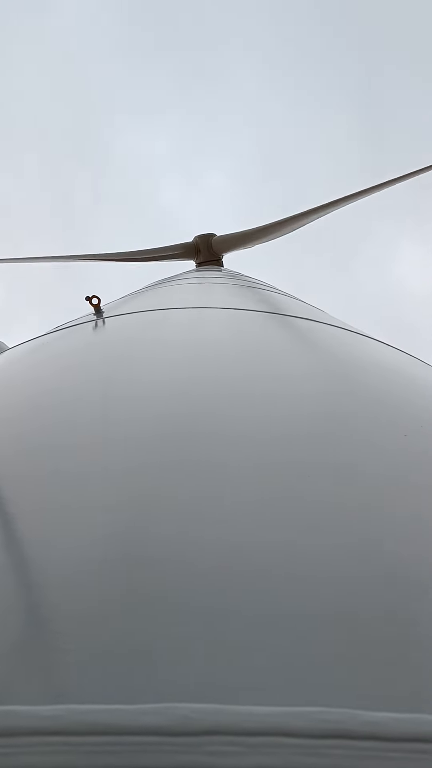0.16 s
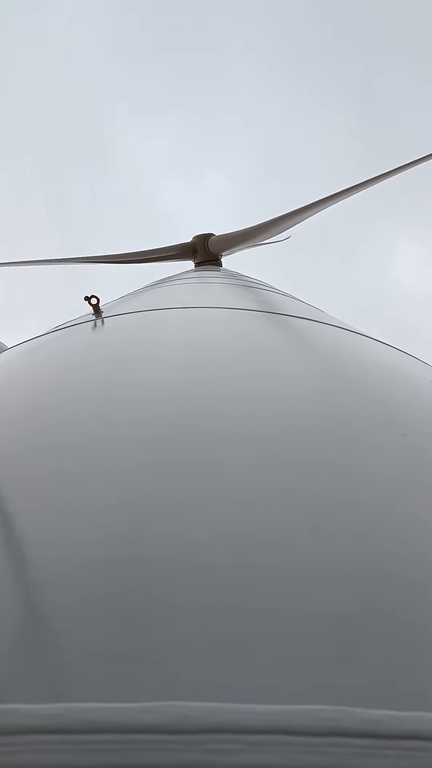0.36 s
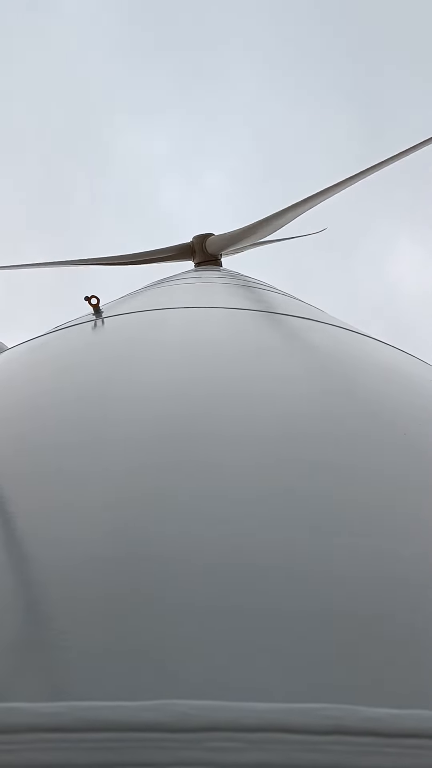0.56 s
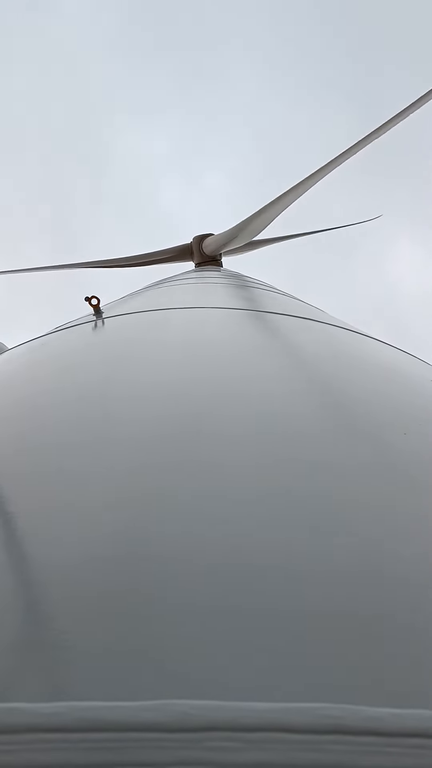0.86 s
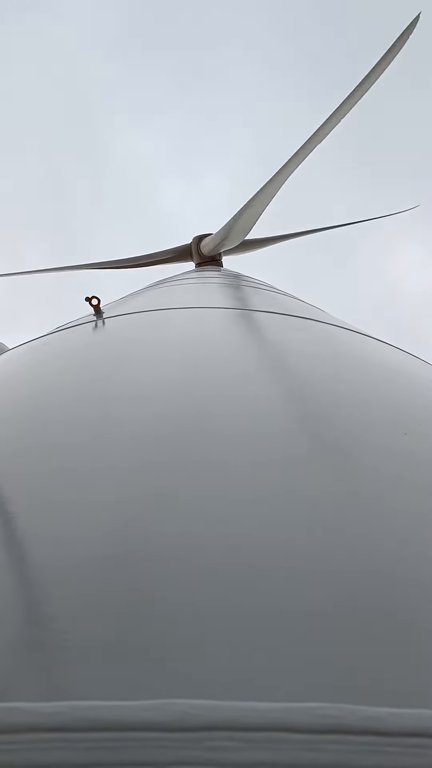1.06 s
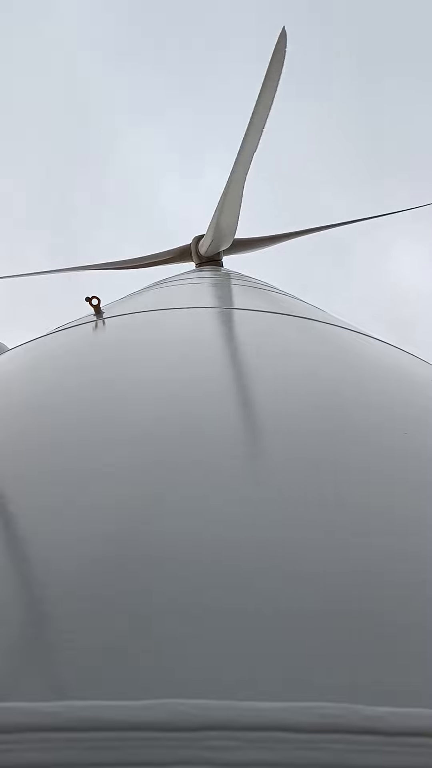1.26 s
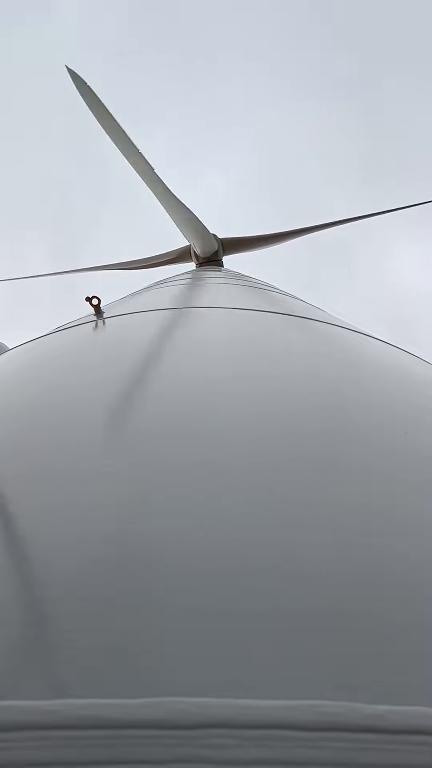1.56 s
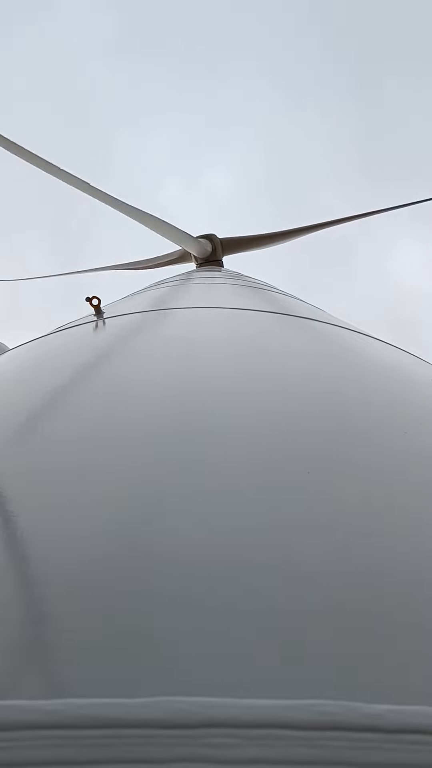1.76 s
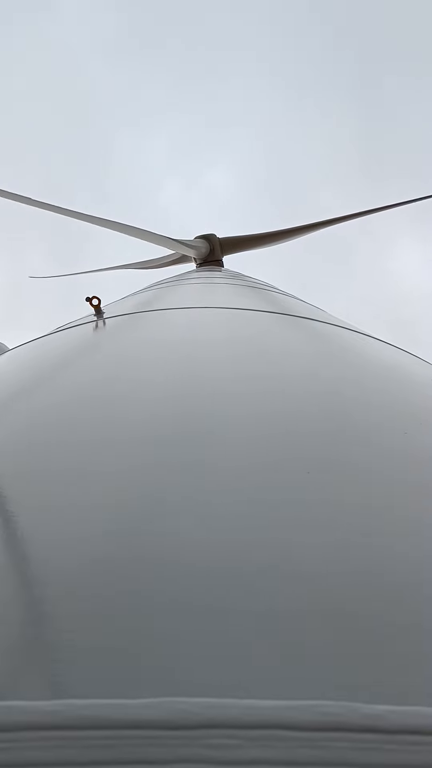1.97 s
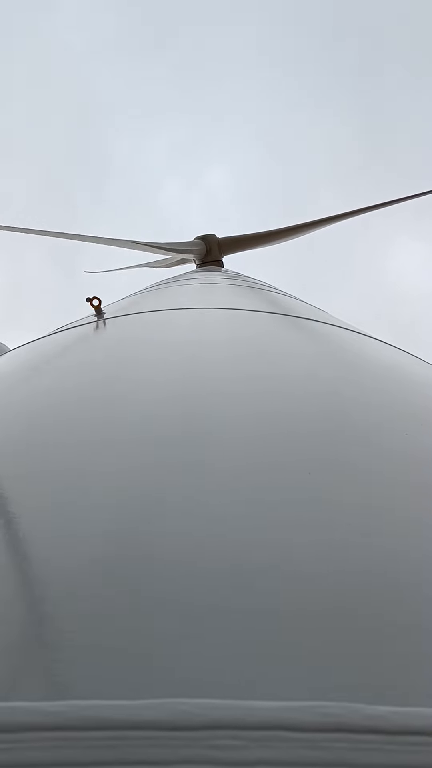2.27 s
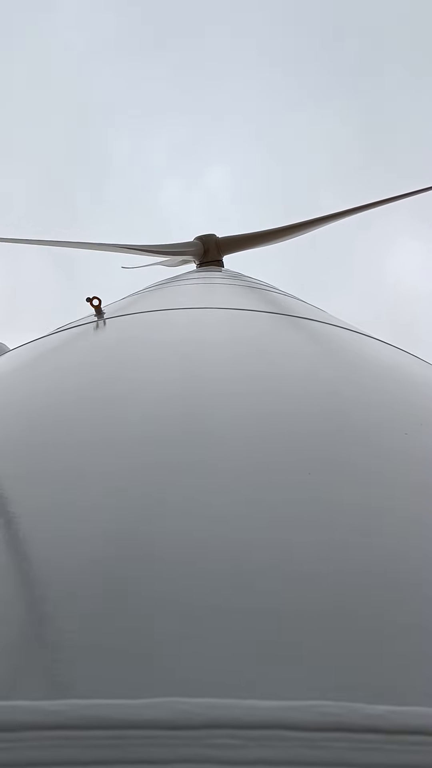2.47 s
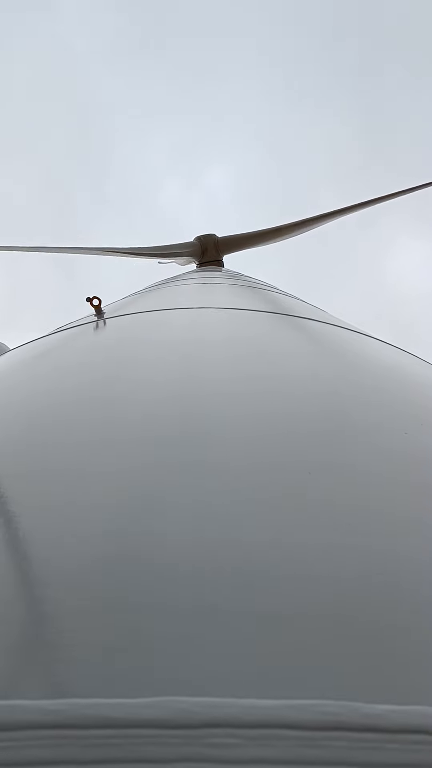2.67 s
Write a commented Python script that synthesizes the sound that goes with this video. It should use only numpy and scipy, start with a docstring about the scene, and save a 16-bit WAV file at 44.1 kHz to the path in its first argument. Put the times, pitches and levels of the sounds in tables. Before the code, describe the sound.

Wind turbine blade swishing overhead, with gusts thumping on the microphone

```python
"""Under a large wind turbine in an open field. From the start there is a steady wash of air, and the
breeze hits the two microphone openings (ports) with low puffs and knocks, mostly on the right.
The previous blade's thin whistle fades as the next blade comes near, its tip whistling high up.
At about 1.3 s it sweeps overhead with an airy swish, the whistle sliding down as it passes and leaves.
Gusts shake the right port just before that, and twice more as the blade moves away."""
import sys
import numpy as np
from scipy import signal
from scipy.fft import rfft, irfft, next_fast_len
from scipy.io import wavfile
from scipy.ndimage import uniform_filter1d

SR = 44100
rng = np.random.default_rng(int(sys.argv[2]) if len(sys.argv) > 2 else 0)


def store_pcm(level_fs):
    """Save levels as 16-bit WAV."""
    pcm = np.round(np.clip(level_fs, -1, 1) * 32767).astype(np.int16)
    wavfile.write(sys.argv[1], SR, np.atleast_2d(pcm).T)


N = 123921
TIME = np.arange(N) / SR
FRAME_S = np.arange(N // 256 + 5)[:, None] * 256 / SR  # time steps for shaping noise
BIN_HZ = np.fft.rfftfreq(1024, 1 / SR)  # pitch steps for shaping noise

# Tone colour (how strong each pitch is) of the rotor and field's wash: pitch_hz, left_db, right_db
WASH_COLOUR = [(20, -7, 5), (42, -4, -5), (93.4, 23, 24.5), (221, 17.5, 18), (324, 6, 0.5), (650, 0, 0),
               (1180, -3.5, -0.5), (1940, -7.5, -5.5), (3280, -9, -10.5), (4120, -13.5, -13),
               (6200, -9.5, -17.5), (6970, -13.5, -22), (7800, -10, -24.5), (8750, -14.5, -9),
               (9800, -21, -18), (11900, -26, -26), (16000, -23, -25)]
# Rise and fall of the high hiss in that wash: time_s, boost_db
HISS_BOOST = [(0, -0.5), (.3, -3.5), (.6, 1), (.9, -1), (1.55, -1), (1.9, 1.5), (2.07, 0.5), (2.17, 2),
              (2.25, 0), (2.36, 1.5), (2.6, 1.5), (2.81, 0.5)]
# Strength of the breeze on the ports: time_s, left_db, right_db
BREEZE_LEVELS = [(0, -30.5, -47), (.15, -42.5, -36), (.36, -42, -42.5), (.52, -47.5, -49), (.7, -42, -37.5),
                 (.86, -57, -35), (.95, -43, -34.5), (1.08, -43, -26.5), (1.19, -50, -38.5),
                 (1.32, -43, -37.5), (1.44, -50, -39), (1.6, -65, -34), (1.7, -62, -28), (1.86, -60, -23.5),
                 (2, -64, -37), (2.09, -69, -34.5), (2.3, -59, -30.5), (2.55, -55, -33),
                 (2.81, -45.5, -31.5)]
# Tone colour of the breeze's rumble: pitch_hz, level_db
RUMBLE_COLOUR = [(20, -16), (44, -42), (64, -11), (88, 0), (125, 0.5), (200, 0.5), (300, -10.5), (450, -24),
                 (700, -37.5), (1200, -54), (3000, -77)]
# Small swirls of air that hit the ports: peak_s, length_s, level_db, hard_edge_db, left_minus_right_db
SWIRLS = [(.027, 0.014, -30.5, -4.5, 12), (0.052, 0.015, -33, -4.5, 11), (.106, 0.011, -28, -16, -18),
          (0.131, 0.01, -22.5, -22, -23), (.16, .01, -24, -15.5, -21), (0.174, 0.0063, -33.5, -6, -16),
          (.22, 0.0063, -28, -22, -28), (0.247, 0.012, -29.5, -11.5, -2), (.279, 0.0092, -31.5, -17, -9),
          (0.442, .022, -30.5, -30, -2), (0.472, .0084, -31.5, -17, -28), (.577, 0.025, -31, -16, -12.5),
          (.625, 0.024, -34, -24, -4.5), (.689, 0.013, -24, -32, -32), (.771, .014, -24.5, -37, -23),
          (.8, 0.014, -27.5, -23, -28), (0.896, 0.013, -30.5, -8, -25), (0.923, 0.019, -26, -29, -15),
          (.947, 0.0087, -29, -11, -22), (.976, 0.0088, -19, -31, -29), (1.035, 0.023, -24, -12.5, -24),
          (1.05, 0.0078, -24.5, -5, -37), (1.067, 0.011, -17, -10, -37), (1.081, 0.0068, -26, -3, -30),
          (1.099, 0.0065, -23.5, -6.5, -28), (1.12, 0.017, -21, -17, -19), (1.161, 0.0067, -25.5, -29, -18),
          (1.226, 0.0051, -18, -23, -32), (1.245, 0.0052, -22, -10.5, 20), (1.287, 0.018, -25, -14, -16),
          (1.33, 0.019, -26, -15, -13), (1.37, 0.0072, -27.5, -11, -18), (1.396, .014, -30, -8, -4),
          (1.455, 0.0033, -28.5, -3.5, -20), (1.475, 0.0088, -22, -6, -20),
          (1.513, 0.006, -23.5, -5.5, -26), (1.532, 0.0086, -22.5, -7.5, -35),
          (1.579, 0.0083, -28.5, -12.5, -32), (1.646, 0.0069, -21.5, -7.5, -29),
          (1.662, 0.017, -28, -9.5, -26), (1.708, 0.017, -25, -16, -22), (1.75, 0.0081, -21, -6, -30),
          (1.783, 0.02, -26.5, -13, -19), (1.812, 0.0081, -29, -6.5, -24), (1.846, .009, -24.5, -4, -33),
          (1.865, 0.034, -25.5, -17.5, -27), (1.9, 0.01, -29, -12.5, -30), (1.917, 0.015, -22, -9.5, -32),
          (1.937, 0.017, -28, -5.5, -32), (1.961, 0.019, -25.5, -9.5, -29), (1.991, 0.015, -28.5, -9, -25),
          (2.017, 0.0028, -27.5, -8, -25), (2.042, 0.016, -27.5, -28, -34), (2.125, 0.03, -29, -23, -26),
          (2.209, 0.0093, -26.5, -7, -21), (2.231, 0.0062, -21.5, -16, -34),
          (2.248, 0.0075, -22.5, -9.5, -35), (2.269, 0.0083, -22.5, -11, -28),
          (2.292, 0.0055, -23.5, -10, -30), (2.308, 0.018, -29.5, -17, -28), (2.328, 0.013, -31.5, -4, -28),
          (2.353, 0.0058, -17, -13, -24), (2.388, 0.013, -21, -14.5, -33), (2.427, 0.0075, -21.5, -31, -27),
          (2.472, .0065, -20, -17, -31), (2.514, 0.0086, -19.5, -3.5, -30), (2.547, 0.0066, -23, -1, -36),
          (2.56, 0.013, -16, -6.5, -36), (2.639, 0.019, -24.5, -8.5, -14.5), (2.695, 0.02, -26, -13, -8),
          (2.711, 0.0074, -29.5, -9, -11), (2.73, 0.0062, -24.5, -30, -33),
          (2.788, 0.0069, -19.5, -9.5, -17)]
# Tone colour of a swirl's dull thump: pitch_hz, level_db
THUMP_COLOUR = [(20, -25), (42, -37), (62, -14), (88, -5.5), (125, -0.5), (200, -2.5), (300, -13),
                (450, -28.5), (700, -44), (1500, -70), (6000, -125)]
# Sharp pressure jumps on the right port: time_s, peak_db, top_hz
PRESSURE_JUMPS = [(.128, -31.5, 500), (0.685, -38, 517), (1.046, -32, 660), (1.066, -37, 720),
                  (1.083, -26.5, 720), (1.098, -30, 690), (1.643, -25.5, 557), (1.748, -25, 690),
                  (1.842, -23.5, 560), (1.9, -24, 505), (1.907, -23, 520), (2.245, -35, 530),
                  (2.289, -28, 654), (2.352, -24, 500), (2.392, -28.5, 710), (2.47, -30, 520),
                  (2.513, -20.5, 740), (2.559, -14.5, 730), (2.791, -25, 560)]
# Stretches where the blade tip whistles:
# mid_slide_pitch_hz, width_hz, level_db, peak_s, rise_s, fall_s, left_minus_right_db
TIP_WHISTLES = [(8690, 170, -53.3, 1.33, .16, .05, -14), (8670, 190, -62, 1.52, .38, .18, -12),
                (9630, 240, -68, 1.28, .09, .06, -6), (9600, 190, -61.3, 1.75, .16, .085, -17),
                (9650, 230, -76, .85, .4, .3, -7), (8420, 680, -59.7, 1.25, .33, .24, -7),
                (8350, 400, -62.5, .7, .05, .14, -11), (8600, 320, -69.5, .36, .14, .2, -14),
                (8650, 240, -70, 2.1, .15, .06, 2)]
# Tone colour of the blade's swish: pitch_hz, left_db, right_db
SWISH_COLOUR = [(199, 7, 5.5), (645, 13.5, 16.5), (940, 2.5, 2), (1540, -17, 5.5), (2070, 4.5, -3.5),
                (2970, -3, -0.5), (4370, -3.5, -5.5), (6050, -8, -14), (7300, -26, -20), (9770, -23, -1.5),
                (11600, -31, -27), (16000, -33, -34)]
# Narrower rushes of air along the blade's way: peak_s, swell_s, level_db, pitch_hz, width_octaves
BLADE_RUSHES = [(0.67, 0.26, -62.5, 690, 1.45), (0.37, 0.15, -66, 1274, 0.19),
                (0.507, 0.021, -57.5, 740, 0.33), (1.234, 0.17, -63, 2200, 0.81),
                (2.3, 0.091, -70, 5100, 0.28)]
# The strongest moments of the gusts: peak_s, swell_s, level_db
GUST_PEAKS = [(1.075, 0.034, -44.5), (1.93, 0.086, -49.5), (2.25, 0.059, -50.5)]


def amp(db):
    """Turns decibels into a number to multiply by."""
    return 10 ** (np.asarray(db) / 20)


def unit(x):
    """Scales a signal to an average strength (rms) of 1."""
    return x / np.sqrt(np.mean(x ** 2) + 1e-30)


def colour(table, hz):
    """Gains at the pitches hz, one row for each level column of a tone colour table."""
    pitches, *columns = np.transpose(table)
    return np.array([amp(np.interp(np.log(hz + 1), np.log(pitches), db)) for db in columns])


def hump(pitch_hz, octaves):
    """A bell-shaped curve around one pitch."""
    return np.exp(-(np.log2((BIN_HZ + 1) / pitch_hz) / octaves) ** 2)


def band(hz, low_hz, top_hz, low_slope, top_slope):
    """Gains that turn down pitches below low_hz and above top_hz; bigger slopes cut harder."""
    return 1 / (1 + (low_hz / hz) ** low_slope) / (1 + (hz / top_hz) ** top_slope)


def pan(left_minus_right_db):
    """Left and right gains that keep the total power the same."""
    gains = np.array([[amp(left_minus_right_db)], [1.]])
    return gains / np.linalg.norm(gains)


def wander(rate_hz):
    """A smooth random wiggle of strength 1, up to about rate_hz fast."""
    padded = next_fast_len(N, True)
    hz = np.fft.rfftfreq(padded, 1 / SR)
    keep_slow = np.exp(-(hz / rate_hz) ** 2) * (hz > 0)
    return unit(irfft(rfft(rng.standard_normal(padded)) * keep_slow, padded)[:N])


def flutter(depth_db, rate_hz):
    """A gain that wobbles at random."""
    return amp(depth_db * wander(rate_hz))


def swell(peak_s, rise_s, fall_s):
    """Gain of a source that beams its sound as it comes near and leaves."""
    return 1 / (1 + .5 * ((TIME - peak_s) / np.where(TIME < peak_s, rise_s, fall_s)) ** 2)


def airy(gain, patch_db=1.6, likeness=0.036):
    """Stereo noise of churning air, shaped by gain, with drifting louder and softer patches."""
    a, b, c, d, patches = rng.standard_normal((5, len(FRAME_S), len(BIN_HZ)))
    patches = uniform_filter1d(patches, size=14, axis=0)  # smooth over time
    patches = unit(uniform_filter1d(patches, size=7, axis=1))  # and over pitch
    left = a + 1j * b
    right = likeness * left + np.sqrt(1 - likeness ** 2) * (c + 1j * d)
    spectra = np.array([left, right]) * gain * amp(patch_db * patches)
    _, noise = signal.istft(spectra.swapaxes(1, 2), nperseg=1024, noverlap=768)
    return unit(noise[:, :N])


def lumpy_flow(shape):
    """The noise of quick, uneven wind in a given tone colour."""
    flow = rng.standard_normal(N) * flutter(depth_db=3, rate_hz=42)
    return unit(irfft(rfft(flow) * shape, N))


def whistle(pitch_hz, width_hz):
    """A fuzzy, fluttering tone: narrow noise that follows a pitch, scattered differently to each port."""
    phase = 2 * np.pi * np.cumsum(pitch_hz * np.ones(N)) / SR
    wobble = flutter(depth_db=2.2, rate_hz=16)
    ports = [unit(wander(width_hz) * np.cos(phase) + wander(width_hz) * np.sin(phase)) for _ in range(2)]
    return wobble * np.array(ports)


def burst(length_s, shape, size):
    """One short burst of pressure in a given tone colour, about strength 1 at its top."""
    from_middle_s = (np.arange(size) - size // 2) / SR
    window = np.exp(-2 * np.log(2) * (from_middle_s / length_s) ** 2)
    noise = irfft(rfft(window * rng.standard_normal(size)) * shape, size)
    return unit(noise) * np.sqrt(np.mean(window ** 2))


def wash():
    """Steady, distant air noise from rotor and field; its high hiss rises and falls a little."""
    hiss_db = hump(pitch_hz=4680, octaves=0.99) * np.interp(FRAME_S, *np.transpose(HISS_BOOST))
    return amp(-47.5) * airy(colour(WASH_COLOUR, BIN_HZ)[:, None] * amp(hiss_db))


def breeze():
    """The breeze pushes on each port separately, making a low, lumpy rumble."""
    times, *port_levels = np.transpose(BREEZE_LEVELS)
    shape = colour(RUMBLE_COLOUR, np.fft.rfftfreq(N, 1 / SR))[0]
    return np.array([lumpy_flow(shape) * amp(np.interp(TIME, times, db)) for db in port_levels])


def previous_blade(fade_db_per_s=12):
    """The thin whistle of the previous blade dies away, far off to the left."""
    return pan(18) * amp(-71.5 - fade_db_per_s * TIME) * whistle(pitch_hz=7950, width_hz=50)


def puffs(size=8192):
    """Each swirl of air hits the ports as a dull thump with a harder edge on top."""
    hz = np.fft.rfftfreq(size, 1 / SR) + 1
    out = np.zeros((2, N + 2 * size))
    dull = colour(THUMP_COLOUR, hz)[0]
    for peak_s, length_s, level_db, edge_db, side_db in SWIRLS:
        top_hz = 401 * 2 ** (0.07 * edge_db)  # harder swirls reach higher
        hard = band(hz, low_hz=301, top_hz=top_hz, low_slope=6, top_slope=5.44)
        at = round(peak_s * SR)
        for port, gain in enumerate(amp(level_db) * pan(side_db)):
            thump = burst(length_s, dull, size)
            edge = amp(edge_db + 1) * burst(0.76 * length_s, hard, size)
            out[port, at:at + size] += gain * (thump + edge)
    return out[:, size // 2:][:, :N]  # puts each burst's middle at its peak_s


def knocks(size=2048):
    """Single jumps of pressure, rounded off by the right port into short knocks."""
    hz = np.fft.rfftfreq(size, 1 / SR) + 1
    out = np.zeros((2, N + 2 * size))
    for time_s, peak_db, top_hz in PRESSURE_JUMPS:
        shape = band(hz, low_hz=240, top_hz=top_hz, low_slope=3, top_slope=5.9)
        random_phase = np.exp(2j * np.pi * rng.random())
        knock = np.roll(irfft(shape * random_phase, size), size // 2)
        at = round(time_s * SR)
        out[1, at:at + size] += amp(peak_db) * knock / abs(knock).max()
    return out[:, size // 2:][:, :N]


def blade_tip(mid_slide_s=1.51, slide_s=.67):
    """The tip's whistles sound higher as it comes near and lower as it leaves (the Doppler effect)."""
    slide = 1 - .125 * np.tanh((TIME - mid_slide_s) / slide_s)
    out = np.zeros((2, N))
    for pitch_hz, width_hz, level_db, peak_s, rise_s, fall_s, side_db in TIP_WHISTLES:
        level = amp(level_db) * swell(peak_s, rise_s, fall_s) ** 1.15
        out += pan(side_db) * level * whistle(pitch_hz * slide, width_hz)
    return out


def blade_swish():
    """The passing blade churns the air into a broad swish, with soft rushes that are higher later on."""
    level = amp(-53) * flutter(depth_db=0.4, rate_hz=6) * swell(peak_s=1.283, rise_s=.42, fall_s=.27)
    out = level * airy(colour(SWISH_COLOUR, BIN_HZ)[:, None])
    for peak_s, swell_s, level_db, pitch_hz, octaves in BLADE_RUSHES:
        out += amp(level_db) * airy(hump(pitch_hz, octaves)) * swell(peak_s, swell_s, swell_s)
    return out


def gusts():
    """At the height of a gust the wind tears at the right port with a harder flutter."""
    hz = np.fft.rfftfreq(N, 1 / SR) + 1
    flow = lumpy_flow(band(hz, low_hz=323, top_hz=566, low_slope=4, top_slope=4.8))
    level = sum(amp(db) * np.exp(-.5 * ((TIME - peak_s) / swell_s) ** 2)
                for peak_s, swell_s, db in GUST_PEAKS)
    return np.array([np.zeros(N), level * flow])


def scene():
    """The turbine overhead and the wind at the microphone, added together."""
    return wash() + breeze() + previous_blade() + puffs() + knocks() + blade_tip() + blade_swish() + gusts()


def record(dry):
    """Fades both ends quickly and cuts off the very highest treble."""
    fade_s, cutoff_hz = .004, 15800
    ends = np.clip(np.minimum(TIME, TIME[-1] - TIME) / fade_s, 0, 1)
    treble_cut = signal.firwin(511, cutoff_hz, window=("kaiser", 9), fs=SR)
    return signal.oaconvolve(dry * ends, treble_cut[None], "same")


dry = scene()
out = record(dry)
store_pcm(out)
```